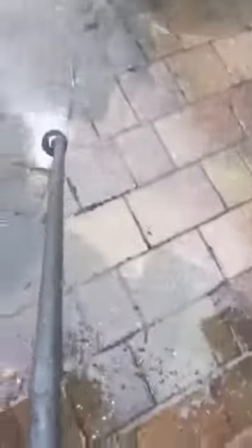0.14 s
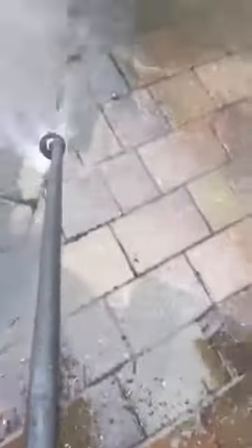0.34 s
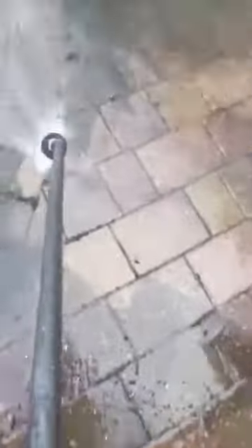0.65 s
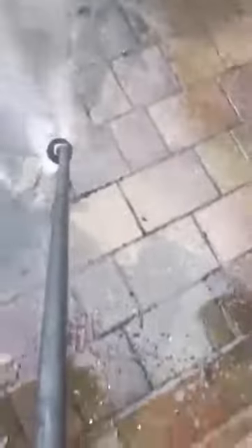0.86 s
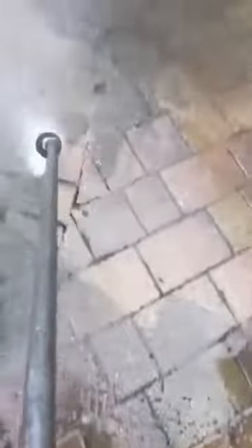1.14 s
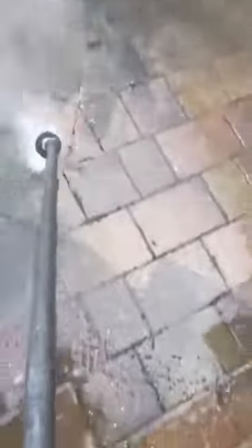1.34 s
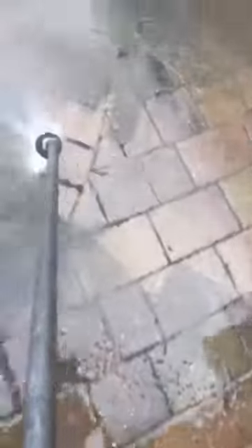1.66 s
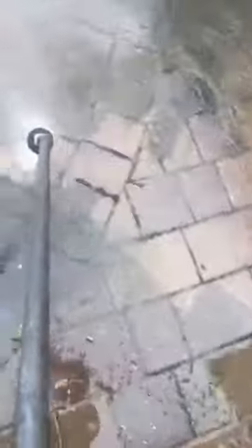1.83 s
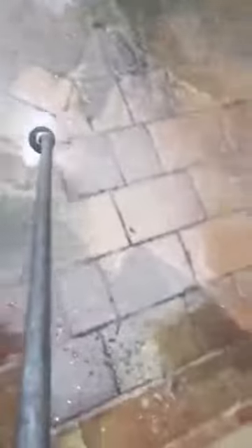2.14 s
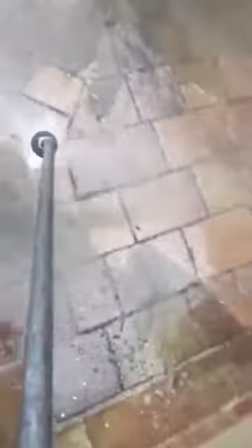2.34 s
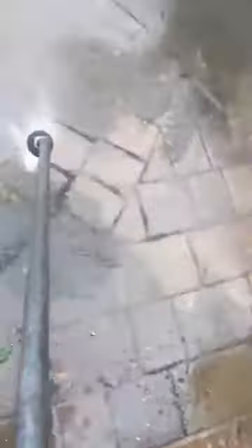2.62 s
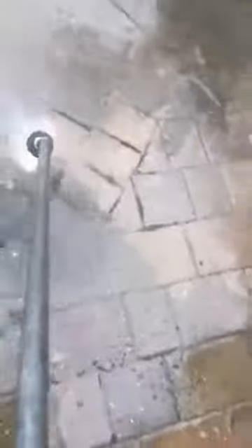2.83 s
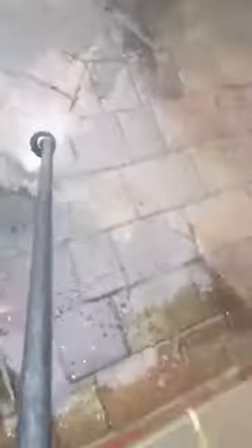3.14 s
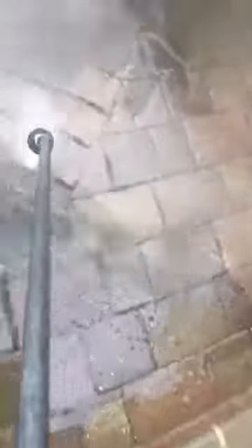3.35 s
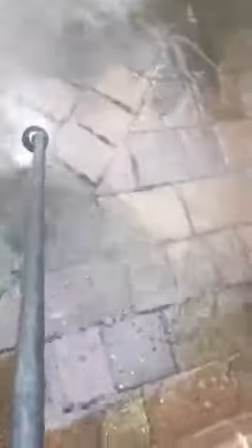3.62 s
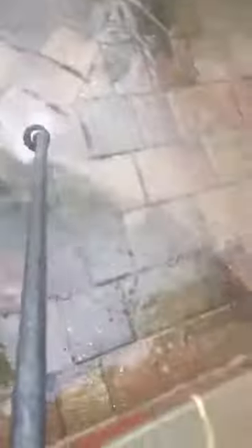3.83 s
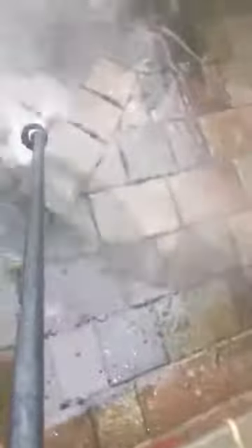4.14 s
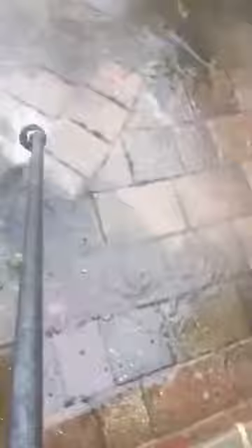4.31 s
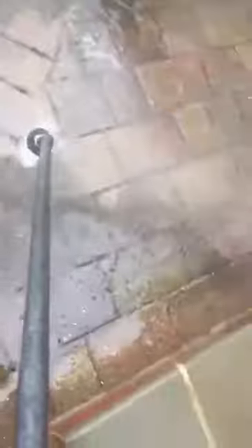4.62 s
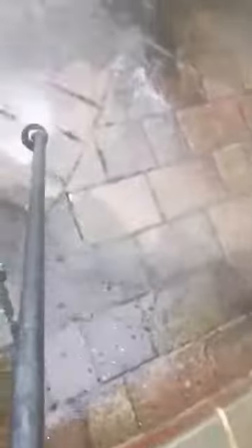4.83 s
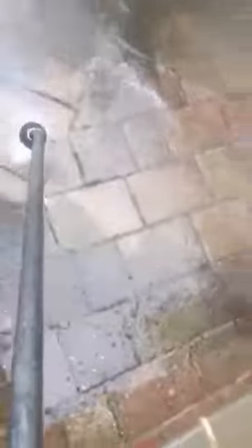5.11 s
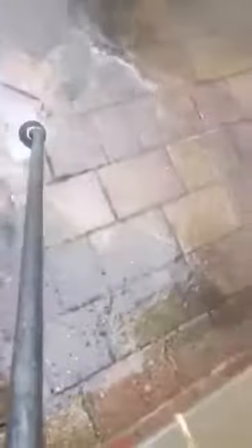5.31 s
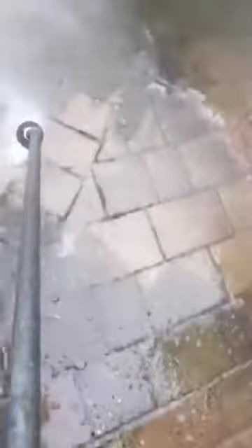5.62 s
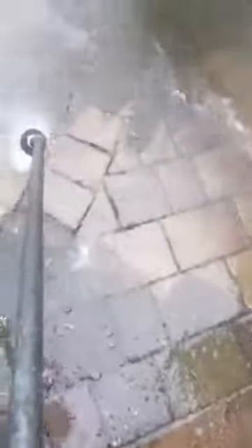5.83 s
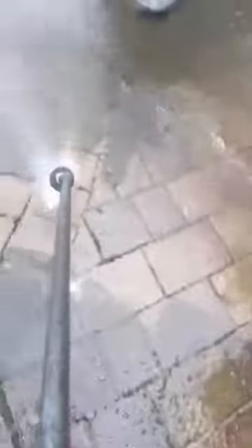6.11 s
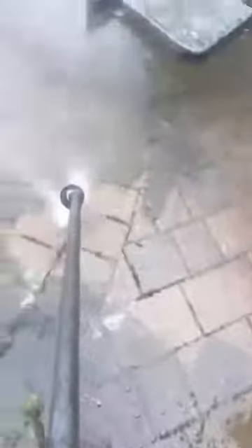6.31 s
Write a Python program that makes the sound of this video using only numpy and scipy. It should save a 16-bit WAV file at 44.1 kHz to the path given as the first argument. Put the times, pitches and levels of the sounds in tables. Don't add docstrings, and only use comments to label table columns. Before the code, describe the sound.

A pressure washer jet is at full force from the first instant, close to a phone outdoors: a dense midrange roar on stone under bright hiss, fizz and mist, with thousands of tiny rising drop pips and grit ticks. The lance sweeps, so the spray brightens around 0.8, 2.25 and 3.95 seconds and dulls around 1.1, 2.55 and 4.9; the bite on stone is firmest near 1.35. Short hollow bursts of tens of milliseconds break through as it crosses joints and pockets, notably at 0.7, 2.0, 2.25, 2.45, 3.4, 3.6, 4.1 and 4.3, with a lower, longer cluster at 4.9 and another hollow knock at 5.6. From about 5.9 it swings into a puddle and low wash swells until the cut near 6.4. The image is mostly centred, with a short paving reflection, watery compressed treble and fleeting wide patches.

```python
import sys
import numpy as np
from scipy import signal
from scipy.fft import rfft, irfft
from scipy.io import wavfile
from scipy.ndimage import uniform_filter1d, minimum_filter1d

SR = 44100
rng = np.random.default_rng(int(sys.argv[2]) if len(sys.argv) > 2 else 0)


def volts(x):
    e = np.asarray(x, float) / 20
    return 10 ** e


def wrap_up_sound(samples):
    columns = np.atleast_2d(samples).T
    tamed = np.clip(columns, -1, 1)
    steps = np.round(tamed * 32767).astype(np.int16)
    wavfile.write(sys.argv[1], SR, steps)


N = 284886
FRAME, HOP = 256, 64
HALF = 1024


def evened(x):
    return x / np.sqrt(np.mean(x ** 2) + 1e-20)


def time_frequency_grid():
    return np.arange(N // HOP + 5) * HOP / SR, np.fft.rfftfreq(FRAME, 1 / SR) + 1


def drift(shape, frames, bins):
    x = rng.standard_normal(shape)
    for _ in range(2):
        x = uniform_filter1d(x, max(round(frames), 1), axis=0)
        x = uniform_filter1d(x, max(round(bins), 1), axis=1)
    return evened(x)


# t/s, spray thrown at phone/dB, bite on stone/dB
LANCE_SWEEP = [(.3, 1.4, .2), (.48, -1, 0), (.82, 3, .5), (1.13, -2, -1.5), (1.35, 1, 1.5),
               (1.65, -1.5, -.5), (2.25, 2.5, 0), (2.55, -2, -1), (2.9, -0.5, 0), (3.45, -0.5, 0.2),
               (3.95, 3, -0.5), (4.18, -1.5, 0), (4.4, 1.5, -.2), (4.7, 1.1, -0.2), (4.93, -2, -.5),
               (5.4, 1.5, .3), (5.65, -1.5, 0.1), (6.46, -2.5, 0)]


def controls():
    puddle_s, fill_s = 5.88, 0.5
    t = time_frequency_grid()[0]
    s, spray_db, bite_db = np.transpose(LANCE_SWEEP)
    puddle = np.clip((t - puddle_s) / fill_s, 0, 1)
    return np.interp(t, s, spray_db), np.interp(t, s, bite_db), puddle


# f/Hz, density/dB per Hz
JET_COLOUR = [(15, -75), (40, -43), (100, -25.5), (151, -12.5), (365, -1.5), (441, 1), (885, -2),
              (1070, -4), (2030, -3), (3570, -5.5), (5630, -3.5), (7370, -6.5), (10500, -5.5),
              (15300, -9.5)]


def colour(hz):
    f, db = np.transpose(JET_COLOUR)
    return volts(np.interp(np.log(hz), np.log(f), db))


def layer(db, share):
    hz = time_frequency_grid()[1]
    return volts(2 * db)[:, None] * share / np.sum(share * colour(hz) ** 2)


# mean level/dB, spray slope/dB per dB, bite slope/dB per dB, puddle gain/dB
JET_LAYERS = [
    (-47.5, -0.8, -.3, 8),
    (-27.5, -0.17, .5, 1.2),
    (-21.5, 0.1, 1.1, .1),
    (-20.5, .55, .4, -.5),
    (-24, 1.15, 0, 0.5),
    (-26, 1.2, 0.2, 0),
]


def jet():
    hz = time_frequency_grid()[1]
    spray_db, bite_db, puddle = controls()
    levels_db = []
    for db, by_spray, by_bite, wet_db in JET_LAYERS:
        levels_db.append(db + by_spray * spray_db + by_bite * bite_db + wet_db * puddle)
    wash_slop_db = 1.5
    levels_db[0] = levels_db[0] + wash_slop_db * drift((len(puddle), 1), 70, 1)[:, 0]
    above = [1]
    for edge_hz in (240, 850, 3700, 7600, 11500):
        above.append(1 / (1 + (edge_hz / hz) ** 6))
    above.append(0)
    return sum(layer(db, low - high) for db, low, high in zip(levels_db, above, above[1:]))


def paving_echo():
    hz = time_frequency_grid()[1]
    spray_db, _, puddle = controls()
    lag_ms = 0.275 + 0.004 * spray_db - 0.06 * puddle
    share = 0.14 / (1 + (hz / 12000) ** 4)
    return abs(1 - share * np.exp(-2j * np.pi * hz * lag_ms[:, None] / 1000))


def to_sound(spectra):
    return signal.istft(spectra.T, nperseg=FRAME, noverlap=FRAME - HOP)[1]


def churn(power):
    patchy_db, flicker_db, gust_db = 0.65, 0.5, 0.43
    wobble_db = patchy_db * drift(power.shape, 24, 5)
    wobble_db = wobble_db + flicker_db * drift(power.shape, 3, 30)
    wobble_db = wobble_db + gust_db * drift(power.shape, 10.7, 40)
    z = rng.standard_normal(power.shape) + 1j * rng.standard_normal(power.shape)
    unit = to_sound(z).std() / np.sqrt(power.shape[1])
    x = to_sound(z * np.sqrt(power) * volts(wobble_db) * paving_echo())[:N] / unit
    return irfft(rfft(x) * colour(np.fft.rfftfreq(N, 1 / SR) + 1), N)


def drops():
    level_db, per_s, low_cut_hz = -39, 2100, 850
    size = volts(2.7 * np.minimum(rng.exponential(1, N), 5))
    size = size * (rng.random(N) < per_s / SR)
    kind, out = rng.integers(0, 24, N), np.zeros(N)
    for k, hz in enumerate(np.geomspace(700, 4500, 24)):
        turns = np.arange(0, 8, hz / SR)
        pip = np.sin(2 * np.pi * turns * (1 + 0.057 * turns))
        pip = pip * np.exp(-turns / 1.87) * np.minimum(turns / 0.39, 1)
        out += signal.oaconvolve(size * (kind == k), pip)[:N]
    thin = signal.butter(4, low_cut_hz, "high", fs=SR, output="sos")
    return signal.sosfilt(thin, volts(level_db) * evened(out))


def cavity_bursts(rows, octaves):
    t, hz = time_frequency_grid()
    power = 0
    for s, db, cavity_hz, ms in rows:
        passing_db = db - 24 * np.minimum(abs(t - s) / (ms / 1000), 3) ** 2.2
        ring = np.exp(-0.5 * (np.log2(hz / cavity_hz) / octaves) ** 2)
        power = power + layer(passing_db, ring)
    return power


# t/s, level/dB, cavity f/Hz, length/ms
POCKET_HITS = [(.566, -19, 3360, 16), (.711, -15, 5380, 23), (.947, -18.5, 2000, 36),
               (2.213, -18, 4800, 40), (2.686, -19, 3520, 26), (3.942, -17.5, 5530, 18),
               (4.108, -16.5, 4440, 14), (4.479, -15.5, 5400, 18), (4.911, -17, 2000, 40),
               (4.935, -17.5, 4470, 78), (4.954, -16.5, 1780, 50), (5.571, -15, 1400, 28),
               (5.912, -15, 2250, 20), (6.244, -21, 4750, 16)]


def pockets():
    return cavity_bursts(POCKET_HITS, octaves=0.45)


# t/s, level/dB, cavity f/Hz, length/ms
JOINT_CROSSINGS = [(.745, -18, 1840, 38), (.947, -21, 1200, 28), (1.656, -19.5, 4000, 18),
                   (1.963, -16, 4500, 18), (2.172, -18, 4260, 13), (2.253, -14.5, 3540, 32),
                   (2.457, -13, 3780, 15), (2.927, -15, 4550, 27), (3.361, -14.5, 2400, 14),
                   (3.634, -14, 3000, 19), (4.112, -13.5, 1500, 17), (4.11, -18, 3000, 14),
                   (4.319, -12, 2800, 22), (4.678, -16.5, 3590, 27), (4.908, -18.5, 1000, 30),
                   (5.914, -18.5, 3000, 16)]


def joints():
    return cavity_bursts(JOINT_CROSSINGS, octaves=0.96)


def scene():
    mono = churn(jet() + pockets() + joints()) + drops()
    return np.array([mono, mono])


def limited(x):
    ceiling, span_samples = 0.8, 221
    room = minimum_filter1d(np.minimum(ceiling / (abs(x) + 1e-9), 1), span_samples)
    return x * uniform_filter1d(room, span_samples // 2)


def cosines():
    place = np.arange(2 * HALF) + 0.5
    turns = (np.arange(HALF)[:, None] + 0.5) * (place + HALF / 2) / HALF
    window = np.sin(np.pi * place / (2 * HALF))
    return (window * np.cos(np.pi * turns) * np.sqrt(2 / HALF)).astype(np.float32)


# f/Hz, line level over step/dB
WATERY_FINENESS = [(250, 30), (600, -1.5), (2000, -2.5), (4500, -1.8), (9000, -2.5), (12000, -4.5),
                   (15000, -5)]


def starved(x, lines):
    offset_samples = 839
    lead = 2 * HALF - offset_samples
    padded = np.pad(x, (lead, -(lead + N) % HALF + HALF)).astype(np.float32)
    size = np.lib.stride_tricks.sliding_window_view(padded, 2 * HALF)[::HALF] @ lines.T
    hz, db = np.transpose(WATERY_FINENESS)
    fine = volts(np.interp((np.arange(HALF) + 0.5) * SR / (2 * HALF), hz, db))
    step = np.sqrt(abs(uniform_filter1d(size ** 2, 33, axis=1))) / fine + 1e-9
    rounded = np.sign(size) * np.floor(abs(size) / step + 0.4) * step
    frames = rounded @ lines.astype(float)
    out = np.pad(frames[:, :HALF].ravel(), (0, HALF)) + np.pad(frames[:, HALF:].ravel(), (HALF, 0))
    return out[lead:lead + N]


# t/s, centre f/Hz
HOLLOW_BANDS = [(.819, 4900), (1.12, 5100), (1.12, 9600), (1.144, 7000), (1.144, 11700), (1.446, 5700),
                (1.446, 12400), (1.84, 8200), (2.653, 7600), (2.816, 4700), (2.862, 4700), (3.303, 10400),
                (3.744, 9300), (4.023, 4700), (4.07, 8300), (4.278, 7600), (4.278, 12400), (4.511, 13000),
                (5.068, 11000), (5.091, 6600), (5.091, 8400), (5.161, 14500), (5.3, 10300), (5.323, 13900),
                (5.648, 4700), (5.765, 7900), (5.974, 5800), (5.974, 13100), (6.275, 6300), (6.275, 9000)]


def hollowed(shared, lines):
    kept, apart, offset_samples = 0.77, 0.61, 263
    mid, side = shared.copy(), np.zeros(N)
    other = np.roll(shared, 7001)
    for s, hz in HOLLOW_BANDS:
        reach_hz = min(0.24 * hz, 1480) / 2
        centre = round((s * SR - offset_samples) / HALF) * HALF + offset_samples
        part = slice(centre - HALF, centre + HALF)
        low, high = [round(f * 2 * HALF / SR) for f in (hz - reach_hz, hz + reach_hz)]
        band = lines[low:high]
        mid[part] -= (1 - kept) * (band @ shared[part]) @ band
        side[part] += apart * (band @ other[part]) @ band
    return np.array([mid + side, mid - side])


def low_pass(x):
    return signal.sosfilt(signal.butter(12, 15340, fs=SR, output="sos"), x)


def record(dry):
    lines = cosines()
    shared = starved(limited(dry[0]), lines)
    mix = hollowed(shared, lines)
    return low_pass(mix)


dry = scene()
out = record(dry)
wrap_up_sound(out)
```